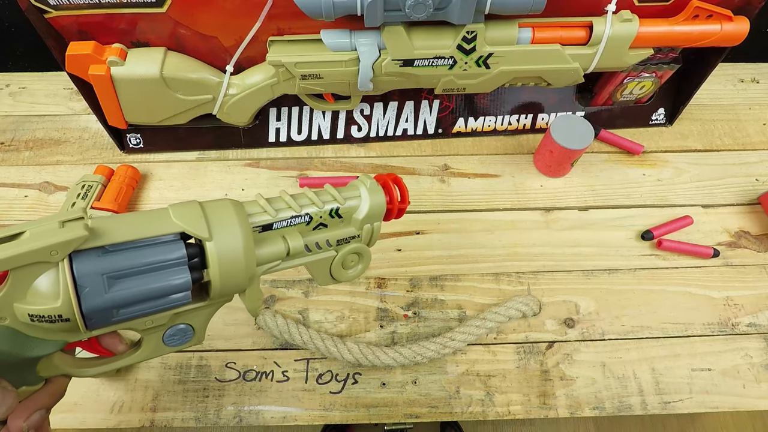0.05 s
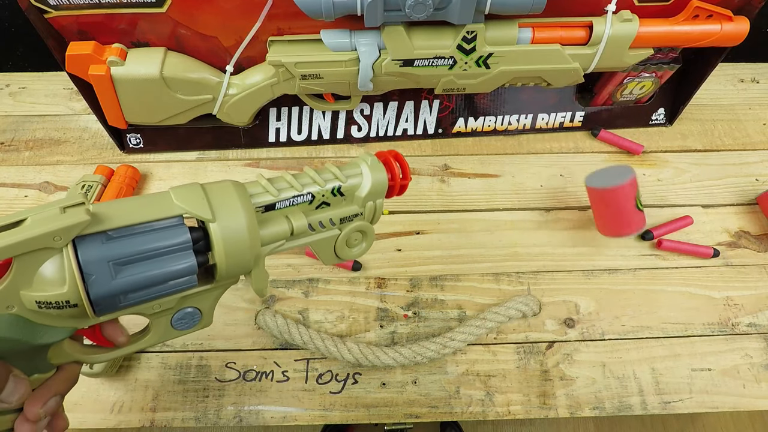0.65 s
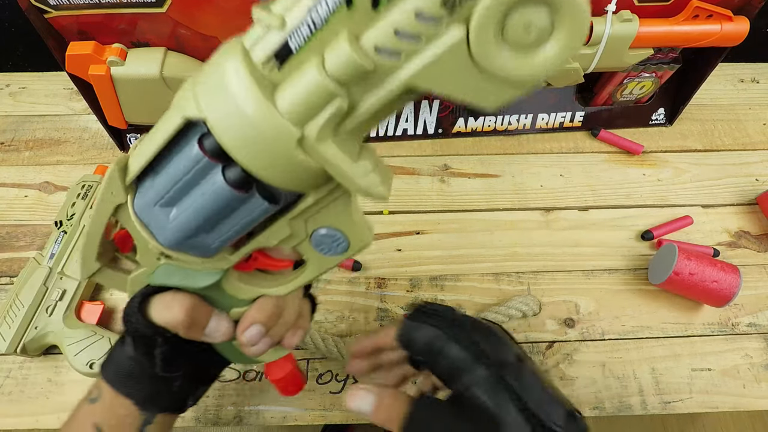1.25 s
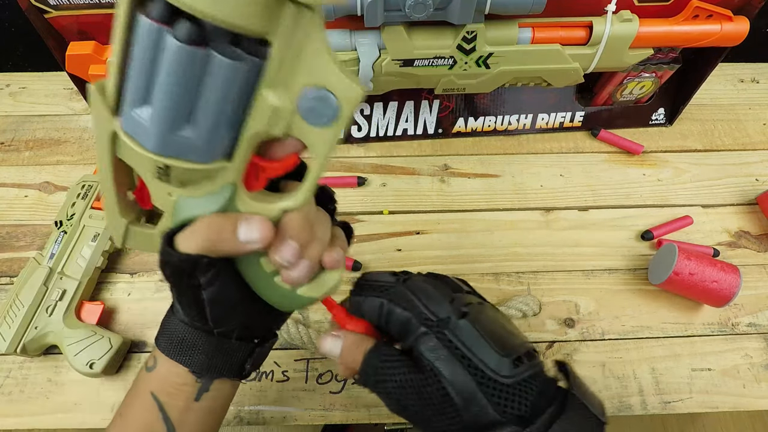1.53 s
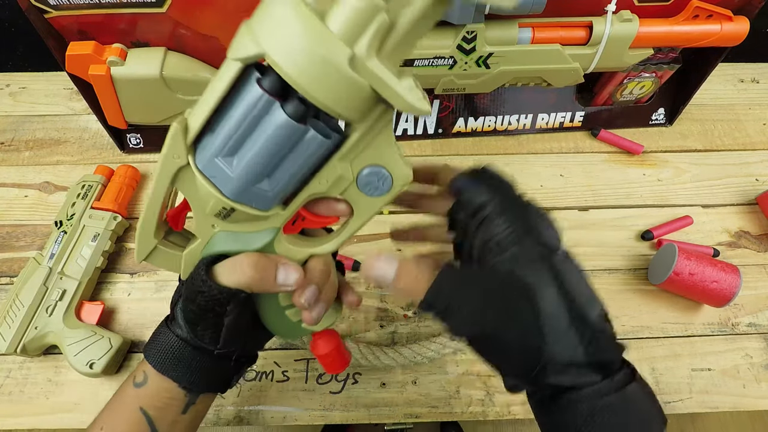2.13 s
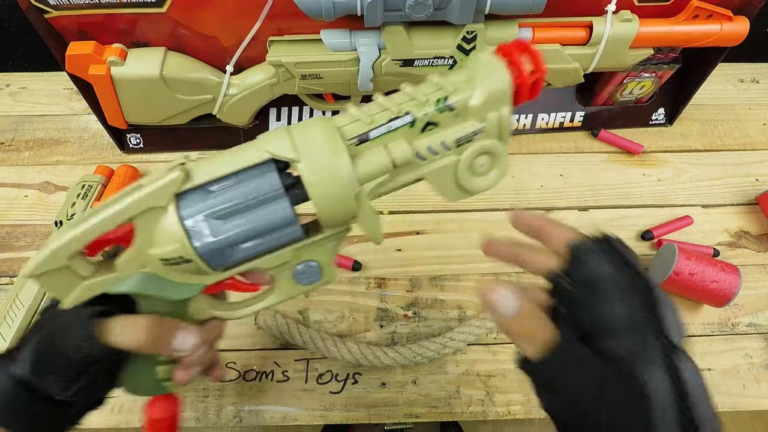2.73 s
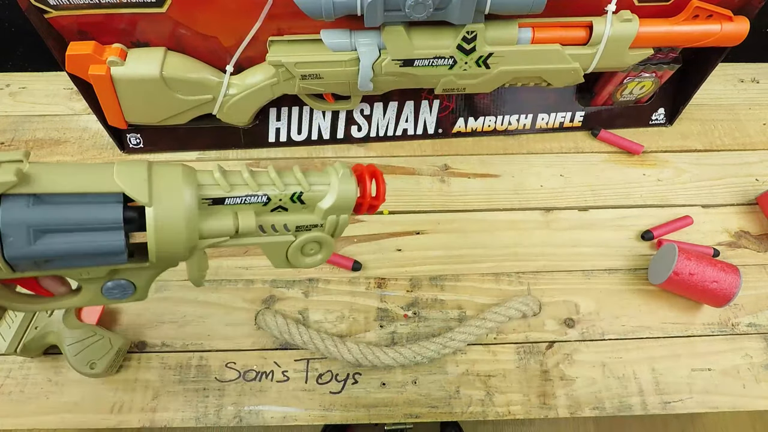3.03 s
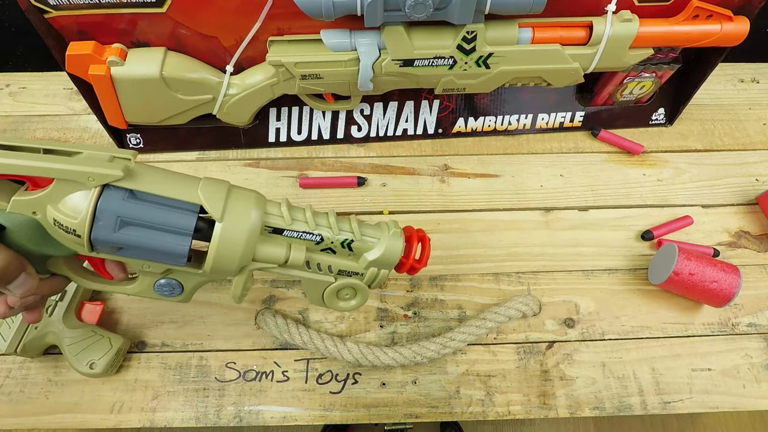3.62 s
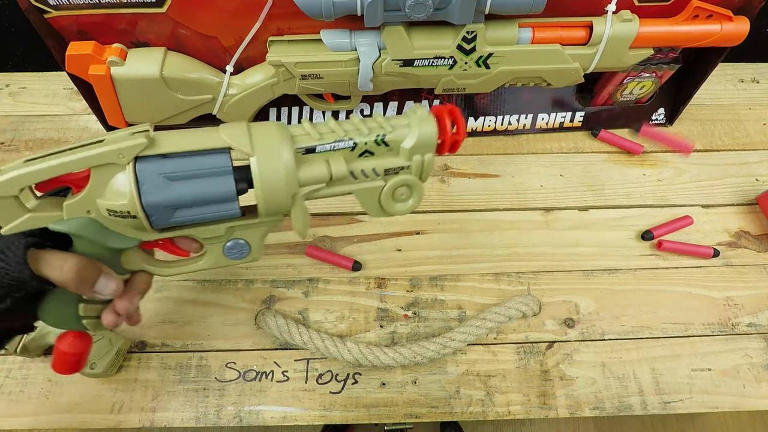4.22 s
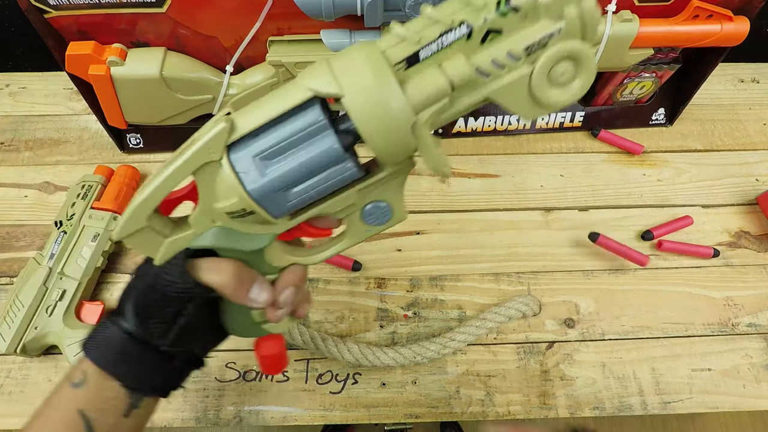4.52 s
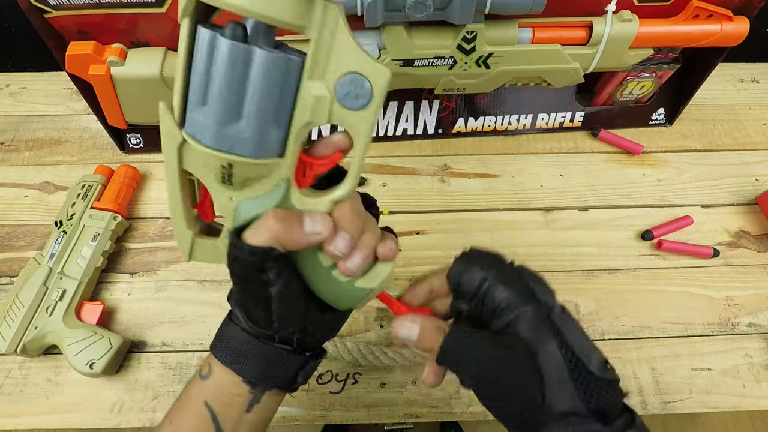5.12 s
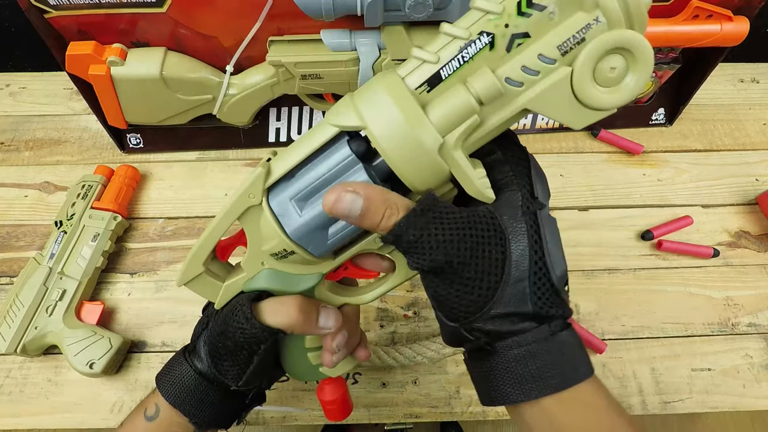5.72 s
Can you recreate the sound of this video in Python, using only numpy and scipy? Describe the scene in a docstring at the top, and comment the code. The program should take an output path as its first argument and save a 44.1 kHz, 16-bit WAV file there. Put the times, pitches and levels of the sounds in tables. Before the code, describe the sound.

A plastic toy dart revolver fires twice with sharp, springy snaps, each followed by knocks on wood, a rasping pull cord and cylinder clicks.

```python
"""In a small room, over a wooden table, a plastic foam-dart revolver is fired twice.
Each shot slams the plunger home; the dart knocks into things, and a light can and darts tumble about.
After each shot a pull cord rasps over a ratchet and reels back, and a gloved hand clicks the cylinder
round. Every hit is a short burst of noise that leaves the struck part and the gun's steel spring
ringing. Gloves rub and bump on the gun, and the room hums quietly."""
import sys
import numpy as np
from scipy import signal
from scipy.fft import rfft, irfft, next_fast_len
from scipy.io import wavfile
from scipy.ndimage import uniform_filter1d

SR = 44100
rng = np.random.default_rng(int(sys.argv[2]) if len(sys.argv) > 2 else 0)


def put_to_file(sound):
    """Save the sound as 16-bit audio at rate SR, in the file named by the first command-line argument."""
    columns = np.atleast_2d(sound).T  # one column per channel
    safe = np.clip(columns, -1, 1)
    whole_steps = np.round(safe * 32767)
    wavfile.write(sys.argv[1], SR, whole_steps.astype(np.int16))


N = 262836


def amp(db):
    """Turns decibels into a number to multiply by."""
    return 10 ** (np.asarray(db) / 20)


def unit(x):
    """Scales a sound to energy 1."""
    return x / np.sqrt(np.sum(x ** 2, axis=-1, keepdims=True) + 1e-20)


def read(points, hz):
    """Reads between the rows of a (f/Hz, value) table, with octaves evenly spaced."""
    f, value = np.transpose(points)
    return np.interp(np.log(hz + 1), np.log(f + 1), value)


def add(mix, s, sound):
    """Lays a sound into the mix at s seconds."""
    part = mix[max(round(s * SR), 0):][:len(sound)]
    part += sound[:len(part)]


def coloured(x, colour):
    """Gives a long sound a colour (its balance of low and high), at average power 1."""
    size = next_fast_len(N)
    gain = amp(read(colour, np.fft.rfftfreq(size, 1 / SR)))
    return unit(irfft(rfft(x, size) * gain, size)[..., :N]) * np.sqrt(N)


def prompt_filter(db):
    """Spectrum of the quickest-starting filter with these levels."""
    log_gain = np.log(amp(np.r_[db, db[-2:0:-1]]))
    return np.exp(np.conj(signal.hilbert(log_gain)))[:len(db)]


def chatter(fade_s, size):
    """A dying burst of tiny contacts that holds all frequencies evenly."""
    fade = amp(-60 * np.arange(size) / SR / fade_s)
    burst = rng.standard_normal(size) * fade
    for _ in range(3):
        spectrum = rfft(burst)
        burst = irfft(spectrum / (abs(spectrum) + 1e-9)) * np.sqrt(fade)
    return burst


def ring(tones, size):
    """A struck part rings with a few tones; each drops 60 dB in its fade time."""
    t = np.arange(size) / SR
    return unit(sum(amp(db - 60 * t / fade_s) * np.cos(2 * np.pi * hz * t) for hz, db, fade_s in tones))


# tones of the steel spring: f/Hz, level/dB, fade/s
SPRING_TONES = [(5396, -13, .2), (5981, 1, 0.46), (6200, -6, 0.14), (6030, -2, 0.54), (6030, 3, .13),
                (6800, -5, .28), (15200, -2.5, .12)]

def blows(hits, colour, tones, ring_db, spring_db, chatter_s, treble_share=1, hollow_db=10, octaves=0.68):
    """Each hit is a burst that sets the struck part and the spring ringing; hits take turns on 3 tracks."""
    size, tracks = 8192, np.zeros((3, N))
    hz = np.fft.rfftfreq(size, 1 / SR)
    # a harder hit is brighter: more treble, less bass
    treble = 1 - 1 / (1 + (hz / 3800) ** 4)
    bass = 1 / (1 + (hz / 400) ** 2)
    tilt = treble_share * treble - bass
    crack = unit(irfft(prompt_filter(read(colour, hz))))
    body = rfft(crack + amp(ring_db) * ring(tones, size) + amp(spring_db) * ring(SPRING_TONES, size))
    for i, (s, db, bright_db, *hollow) in enumerate(hits):
        # the spot that is hit may favour one hollow pitch
        hump = sum(hollow_db * np.exp(-(np.log2((hz + 1) / pitch) / octaves) ** 2) for pitch in hollow)
        tone = irfft(body * prompt_filter(bright_db * tilt + hump))
        blow = unit(signal.fftconvolve(chatter(chatter_s, size), tone))
        add(tracks[i % 3], s, amp(db) * np.sqrt(SR / 200) * blow)
    return tracks


def resonate(x, hz, width_hz):
    """Brings out one pitch, steady or moving, as a hollow body does; average power 1."""
    turn = np.exp(2j * np.pi * np.cumsum(hz * np.ones(N)) / SR)
    decay = np.exp(-np.pi * width_hz / SR)
    ringing = turn * signal.lfilter([1], np.poly([decay, decay]), np.gradient(x) / turn)
    return unit(ringing.real) * np.sqrt(N)


def even(response):
    """Flattens the broad humps in an echo's colour and keeps its fine ripple."""
    power = uniform_filter1d(abs(rfft(response)) ** 2, 48) + 1e-9
    return unit(irfft(rfft(response) * np.array([prompt_filter(-10 * np.log10(p)) for p in power])))


# how long the walls echo: f/Hz, fade/s
WALL_ECHO = [(100, 0.67), (300, 0.34), (1000, 0.28), (2500, 0.31), (6300, 0.28), (16000, 0.26)]

def room(x, near_db, far_db, near_fade_s, size=32768, left_lag_samples=10):
    """Sound arrives on the right first; nearby surfaces scatter it, then the far walls."""
    t = np.arange(size) / SR
    near, far = rng.standard_normal((2, 2, size))
    near = unit(near * amp(-60 * t / near_fade_s) * (t > .001))
    hz, at, bands = signal.stft(far, SR, nperseg=256)
    bands = bands * amp(-60 * at / read(WALL_ECHO, hz)[:, None])
    far = signal.istft(bands, SR, nperseg=256)[1][:, :size]
    far = unit(far * (1 - np.exp(-t / 0.014)))
    echoes = rfft(amp(near_db) * near + amp(far_db) * far)
    # low sounds reach both sides alike
    same = 1 / (1 + (np.fft.rfftfreq(size, 1 / SR) / 480) ** 2)
    echoes[1] = same * echoes[0] + np.sqrt(1 - same ** 2) * echoes[1]
    response = irfft(echoes)
    response[0, left_lag_samples] += 1
    response[1, 0] += 1
    return 2 * signal.oaconvolve(x[None], even(response), axes=1)[:, :N]


def scatter(tracks, near_db, far_db, near_fade_s):
    """Hits land in different places, so each track gets its own echoes."""
    return sum(room(track, near_db, far_db, near_fade_s) for track in tracks)


# colour of the room's hum: f/Hz, level/dB
HUM_COLOUR = [(25, -9.5), (55, -11.5), (90, 1), (140, -6), (350, -29), (1000, -39.5), (16000, -57)]

def room_hum():
    """A quiet, low noise, nearly the same on both sides."""
    return amp(-70) * coloured(rng.standard_normal(N) + .3 * rng.standard_normal((2, N)), HUM_COLOUR)


# clicks of the trigger and loose shell parts, and the sharp cracks of the can as it knocks (near .94 and .99
# s): t/s, level/dB, brightness/dB
CLICKS = [(.014, -51, 7), (.705, -37, 1), (.72, -33, -13.5), (.938, -33.5, -11.5), (.992, -36.5, 16.5),
          (1.082, -38.5, 17.5), (1.164, -33.5, 19), (1.2237, -41, 10), (1.83, -39, 2), (2.22, -45, 7),
          (2.274, -42.5, -6.5), (2.6725, -21.5, 7), (2.685, -27.5, -4.5), (2.7587, -39, 3),
          (2.888, -43, -5.5), (2.976, -54, -11), (3.075, -54.5, -9), (3.12, -45, 2), (3.16, -48, 10),
          (3.202, -51, -4), (3.288, -44.5, 3), (3.876, -30, 11), (4.6045, -39.5, 20), (5.321, -44.5, -20),
          (5.357, -45.5, 8), (5.645, -38.5, -2), (5.8916, -42, -1)]
# colour of a click: f/Hz, level/dB
CLICK_COLOUR = [(100, -22), (500, -28), (1700, -0.5), (4200, -9.5), (6100, 1.5), (9800, -24), (15500, -18)]
# tones of the gun's plastic shell: f/Hz, level/dB, fade/s
SHELL_TONES = [(1180, -0.5, 0.024), (1384, -3, 0.12), (1560, -3.5, 0.065), (2260, 2.5, 0.078)]

def shell_clicks(effort, count=90):
    """Small parts click, and the shell ticks at random, as loudly as the hands work it."""
    place = rng.random(count)
    force, hardness = rng.standard_normal((2, count))
    at = ((np.arange(count) + place) * N / count).astype(int)
    tick_db = 20 * np.log10(effort[at] + 1e-9) + 8 + 8 * np.clip(force, -2, 2)
    ticks = list(zip(at / SR, tick_db, 8 + 7 * hardness))
    tracks = blows(CLICKS + ticks, CLICK_COLOUR, SHELL_TONES, ring_db=-15, spring_db=-18, chatter_s=0.012)
    return scatter(tracks, near_db=8, far_db=-4, near_fade_s=0.08)


# the two shots: t/s, level/dB, loss per bounce/dB, brightness/dB
SHOTS = [(0.371, -8.5, 4.5, 0), (3.741, -11, 0.7, 2)]
# colour of the slam: f/Hz, level/dB
SLAM_COLOUR = [(30, -52.5), (85, -21), (120, -4), (165, -17.5), (225, -3), (450, -9.5), (650, -18.5),
               (1200, -13), (2300, -11.5), (4200, -23), (6300, -6.5), (9500, -29.5), (15500, -25.5)]
# tones of the barrel: f/Hz, level/dB, fade/s
BARREL_TONES = [(115, -11, 0.45), (224, -0.5, 0.2), (259, -1, 0.17), (1107, -2, 0.084)]

def plunger_slams(first_gap_s=.0022, gap_growth=1.45, dulling_db=2.5):
    """The plunger strikes and bounces, each time later, weaker and duller."""
    k = np.arange(4)
    gaps = first_gap_s * gap_growth ** k
    hits = []
    for s, db, loss_db, bright_db in SHOTS:
        hits += zip(s + np.cumsum(gaps) - gaps, db - loss_db * k, bright_db - dulling_db * k)
    tracks = blows(hits, SLAM_COLOUR, BARREL_TONES, ring_db=-19, spring_db=-27.5, chatter_s=.025)
    return scatter(tracks, near_db=11.5, far_db=-3.5, near_fade_s=0.1)


# knocks on wood: t/s, level/dB, brightness/dB, hollow pitch f/Hz
KNOCKS = [(.4072, -13, 7.5, 650), (.428, -18.5, -6.5, 437), (.452, -23, 11, 810), (.6065, -27.5, 1.5, 590),
          (.81, -27.5, 5.5, 620), (.985, -28.5, -0.5, 600), (1.084, -35, 2.5, 560), (1.272, -38.5, 29, 688),
          (3.7838, -15, 15, 800), (3.794, -16.5, 7, 298), (4.024, -13, -0.5, 530), (4.2185, -27, 2, 570),
          (4.416, -30.5, -5, 536), (4.487, -35.5, -15, 485), (4.665, -35, 4, 540)]
# colour of a knock: f/Hz, level/dB
KNOCK_COLOUR = [(40, -32), (200, 0), (460, -9.5), (900, -8.5), (1600, -15.5), (2400, -12), (3900, -25.5),
                (6300, -16), (10000, -41), (15500, -36.5)]
# tones of the wooden table: f/Hz, level/dB, fade/s
TABLE_TONES = [(206, -1.5, 0.32), (293, -4, 0.25), (457, 8, 0.088)]

def table_knocks():
    """Dart and can knock on the table, each time with a different hollow pitch."""
    tracks = blows(KNOCKS, KNOCK_COLOUR, TABLE_TONES, ring_db=-9, spring_db=-39, chatter_s=0.013,
                   treble_share=0.19, hollow_db=10.5)
    return scatter(tracks, near_db=6.5, far_db=-6, near_fade_s=0.1)


# the can, and later the darts, tumble to rest: t/s, level/dB, hollow pitch f/Hz
CAN_ROLL = [(.608, -34, 330), (.655, -39.5, 233), (.72, -46.5, 200), (.79, -37, 300), (.825, -47.5, 520),
            (.92, -55.5, 580), (.955, -41.5, 260), (1.01, -49, 430), (1.16, -51, 520), (1.28, -67.5, 500)]
DART_ROLL = [(4.195, -65, 420), (4.32, -39, 272), (4.4, -59, 300), (4.43, -60, 520), (4.475, -55, 450),
             (4.515, -40, 300), (4.65, -52.5, 393), (4.695, -43.5, 450), (4.8, -73, 430)]

def roll(path, taps_per_s=370):
    """A hollow thing tumbles over the boards: many soft taps whose pitch moves as it turns."""
    s, db, hz = np.transpose(path)
    t = np.arange(N) / SR
    taps = (rng.random(N) < taps_per_s / SR) * rng.standard_normal(N)
    loudness = amp(np.interp(t, s, db)) * (t > s[0]) * (t < s[-1])
    return loudness * resonate(taps, np.interp(t, s, hz), width_hz=250)


def held(start, end, db, rise_s=0.065, release_db_per_s=105.5):
    """The loudness of one hand movement: it rises, holds and dies away."""
    t = np.arange(N) / SR
    return np.clip((t - start) / rise_s, 0, 1) * amp(db - release_db_per_s * np.maximum(t - end, 0))


# the hands move on the gun: start t/s, end t/s, rubbing level/dB, bumping level/dB
GRIPS = [(0.74, 1.3, -59, -57.5), (1.315, 2.08, -60.5, -62.5), (2.062, 2.774, -63, -68),
         (2.73, 2.86, -66.5, -54.5), (2.886, 3.246, -70, -68.5), (4.092, 5.28, -58.5, -55),
         (5.352, 5.93, -58, -62)]

def hand_movements():
    """How hard the hands rub (effort) and bump (weight) from moment to moment."""
    effort = np.max([held(start, end, db) for start, end, db, _ in GRIPS], axis=0)
    weight = np.max([held(start, end, db) for start, end, _, db in GRIPS], axis=0)
    return effort, weight


# colour of the rubbing: f/Hz, level/dB
RUB_COLOUR = [(410, -20), (700, 7.5), (970, 2.5), (2830, 4), (3730, -12), (6120, -3.5), (9670, -18.5),
              (15900, -24)]

def glove_rubbing(effort, grains_per_s=110, spread_db=5, hiss=0.022):
    """Gloves scratch over the shell in small grains."""
    grains = rng.random(N) < grains_per_s / SR
    strength = amp(spread_db * np.minimum(rng.exponential(1, N), 4))
    scratches = grains * strength * rng.choice([-1, 1], N)
    return effort * coloured(scratches + hiss * rng.standard_normal(N), RUB_COLOUR)


# the gun is held on aim: start t/s, end t/s, level/dB
AIM = (2.71, 3.42, -77)

def hollow_tone(effort):
    """A faint hollow tone goes with the rubbing and lingers while the gun is aimed."""
    return (amp(-9) * effort + held(*AIM)) * resonate(rng.standard_normal(N), hz=380, width_hz=230)


# colour of the bumping: f/Hz, level/dB
BUMP_COLOUR = [(25, -29), (95, 2), (170, -1), (300, -12), (1000, -49.5)]

def hand_bumps(weight):
    """Hands and arms shift their weight: a dull, low rumble."""
    return weight * coloured(rng.standard_normal(N) + .25 * rng.standard_normal((2, N)), BUMP_COLOUR)


# the slack cord tightens: t/s before the first tooth, level/dB relative to the pull, brightness/dB
TAKE_UP = [(0.046, -29, -4.5), (.026, -23, -6), (0.014, -25.5, -8), (0.0049, -11.5, 2.5)]

def pull(s, db, bright_db, skip_db, count=4, tooth_gap_s=0.012, slow_start_s=0.0042):
    """The cord tightens, a small lever skips over the ratchet teeth ever faster, the plunger latches."""
    k = np.arange(count)
    at = s + np.r_[0, np.cumsum(tooth_gap_s + slow_start_s * 0.53 ** k)]
    force, pitch, late = rng.uniform(-0.75, 1, (3, count))  # no two teeth alike
    level = db - 0.5 * k / count + 1.5 * force
    hollow_hz = 1100 * 2 ** (0.66 * pitch)
    take_up = [(s - lead_s, db + rel_db, tone_db) for lead_s, rel_db, tone_db in TAKE_UP]
    teeth = [(at[i], level[i], bright_db, hollow_hz[i]) for i in k]
    # the lever lands a second time just after each tooth
    skips = [(at[i] + 0.0027 + 0.0016 * late[i], level[i] + skip_db, bright_db) for i in k]
    latch = (at[-1], db - 3.5, -0.5, 890)  # t/s, level/dB, brightness/dB, f/Hz
    return take_up + teeth + skips + [latch]


def reel_back(s, db, rattle_s):
    """The cord's handle touches the guide, scrapes into its seat and stops with a duller knock."""
    touch = (s - rattle_s, -24, 0.5)  # t/s, level/dB, brightness/dB
    scrape = (s - 0.0099, db - 0.5, 15)
    stop = (s, db, -6.5)
    return [touch, scrape, stop]


# the cord is pulled: first tooth t/s, level/dB, brightness/dB, relative level of the skips/dB
PULLS = [(1.5403, -11, 2, -8), (4.873, -9.5, 2.5, -12.5)]
# the cord reels back: stop t/s, level/dB, rattle t/s before the stop
RETURNS = [(1.865, -15, .016), (5.176, -21, 0.026)]
# colour of a ratchet tooth: f/Hz, level/dB
TOOTH_COLOUR = [(40, -35.5), (110, -26), (200, -24.5), (560, -19.5), (820, -4), (1050, -15.5),
                (1300, -13.5), (2300, -6.5), (4100, -12), (6100, 1), (9500, -20), (15500, -18)]

def pull_cord():
    """The cord rasps out and reels back in; each small hit rings the shell."""
    hits = [hit for row in PULLS for hit in pull(*row)]
    hits += [hit for row in RETURNS for hit in reel_back(*row)]
    tracks = blows(hits, TOOTH_COLOUR, SHELL_TONES, ring_db=-20, spring_db=-28.5, chatter_s=0.012,
                   hollow_db=5, octaves=0.33)
    return scatter(tracks, near_db=10.5, far_db=-5, near_fade_s=0.071)


# the cylinder drops into its catch: t/s, level/dB, brightness/dB
CATCHES = [(2.4239, -17.5, 3), (5.694, -17.5, 5.5), (5.9379, -21, 4.5)]
# colour of the catch: f/Hz, level/dB
CATCH_COLOUR = [(300, -31), (680, -5), (900, -18.5), (1230, -4), (1800, -9.5), (2250, -6.5), (4300, -25),
                (6100, -8), (9000, -35.5), (15500, -41)]
# tones of the cylinder: f/Hz, level/dB, fade/s
CYLINDER_TONES = [(1190, 5, 0.14), (1337, 2, 0.11), (1620, -9, 0.057), (2139, -5, .18), (2240, -10, .15)]

def cylinder_catches(bounce_s=0.0025, bounce_db=-8.5):
    """The turning cylinder hits its stop and bounces once."""
    hits = []
    for s, db, bright_db in CATCHES:
        hits += [(s, db, bright_db), (s + bounce_s, db + bounce_db, bright_db)]
    tracks = blows(hits, CATCH_COLOUR, CYLINDER_TONES, ring_db=-8.5, spring_db=-40, chatter_s=0.0101)
    return scatter(tracks, near_db=4.5, far_db=-7.5, near_fade_s=0.066)


# snaps inside the gun: t/s, level/dB, brightness/dB
SNAPS = [(3.8075, -8.5, -0.5), (4.0815, -15, 3.5)]

def spring_snaps():
    """After the second shot the mechanism snaps back and sets the spring singing."""
    tracks = blows(SNAPS, CLICK_COLOUR, SHELL_TONES, ring_db=-17, spring_db=-21.5, chatter_s=0.01)
    return scatter(tracks, near_db=11.5, far_db=-1, near_fade_s=0.059)


# a dart hits a panel: t/s, level/dB, brightness/dB
CLACKS = [(4.294, -20, -0.5)]
# colour of the clack: f/Hz, level/dB
CLACK_COLOUR = [(60, -14), (300, 1.5), (750, -4), (1200, -1), (1900, 1), (3500, -20.5), (7800, -11),
                (10000, -30.5)]
# tones of the panel: f/Hz, level/dB, fade/s
PANEL_TONES = [(424, -2, 0.35), (1130, -1, 0.13), (1330, -0.82, 0.24), (1800, 0, 0.16)]

def panel_clack():
    """A bouncing dart clacks on a hard, thin panel and makes it ring."""
    tracks = blows(CLACKS, CLACK_COLOUR, PANEL_TONES, ring_db=-7, spring_db=-44, chatter_s=0.017)
    return scatter(tracks, near_db=7.5, far_db=-8, near_fade_s=.08)


def scene():
    """Gun, knocks and hands in the room, over its quiet hum; a little louder on the right."""
    effort, weight = hand_movements()
    shots = plunger_slams() + table_knocks() + panel_clack()
    gun_parts = pull_cord() + spring_snaps() + shell_clicks(effort) + cylinder_catches()
    gloves = room(glove_rubbing(effort) + hollow_tone(effort), near_db=6, far_db=3, near_fade_s=0.16)
    rolls = room(roll(CAN_ROLL) + roll(DART_ROLL), near_db=-0.5, far_db=-7.5, near_fade_s=0.24)
    mix = shots + gun_parts + gloves + rolls + room_hum() + hand_bumps(weight)
    return mix * amp([[-.35], [.35]])


def record(dry, top_hz=16050):
    """Rounds off the loudest peaks, then cuts the very highest treble."""
    limited = dry / (1 + dry ** 8) ** (1 / 8)
    treble_cut = signal.firwin(511, top_hz, window=("kaiser", 8), fs=SR)
    return signal.oaconvolve(limited, treble_cut[None], "same")


dry = scene()
out = record(dry)
put_to_file(out)
```